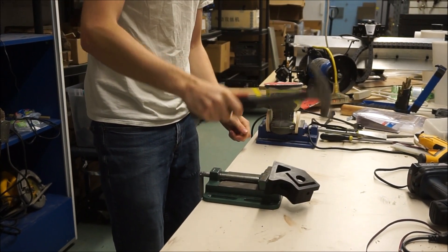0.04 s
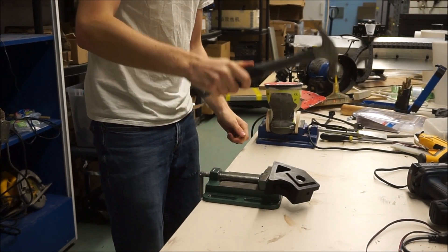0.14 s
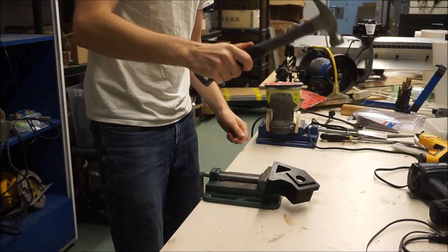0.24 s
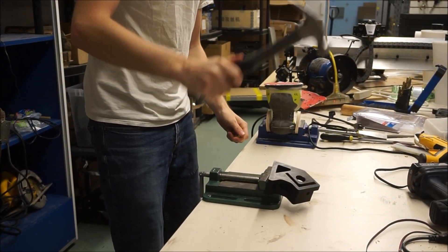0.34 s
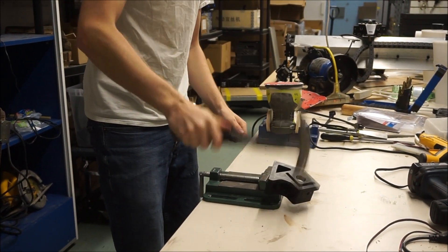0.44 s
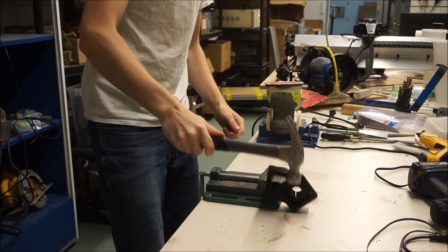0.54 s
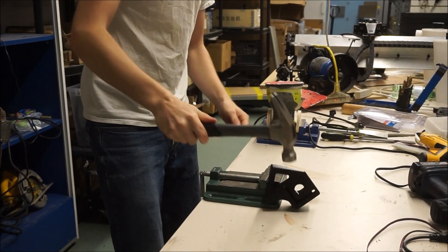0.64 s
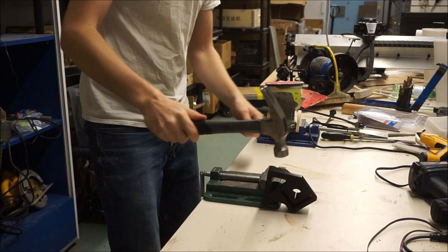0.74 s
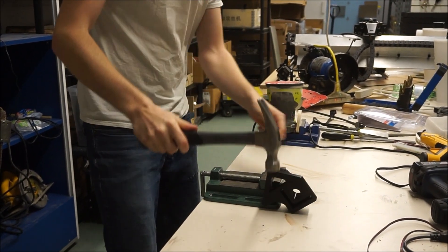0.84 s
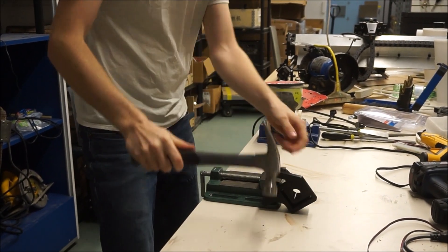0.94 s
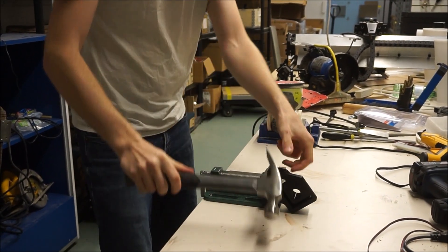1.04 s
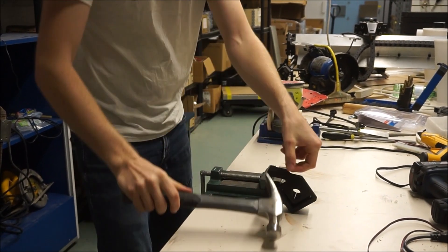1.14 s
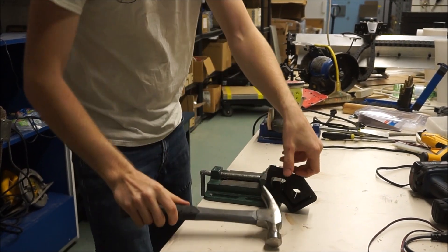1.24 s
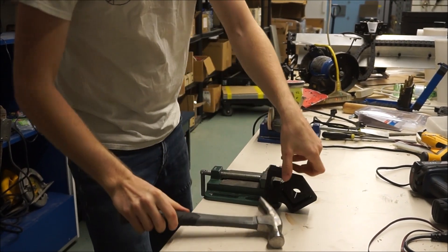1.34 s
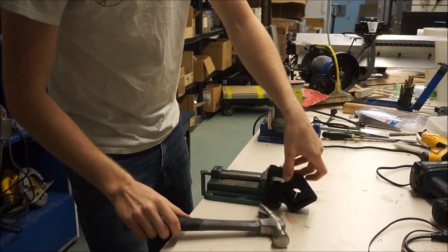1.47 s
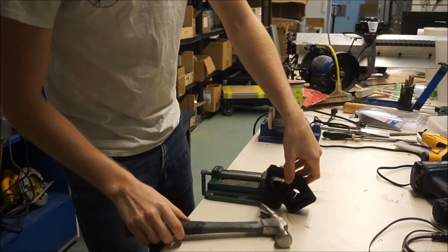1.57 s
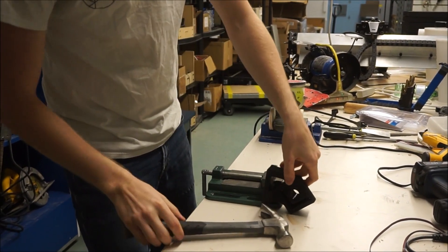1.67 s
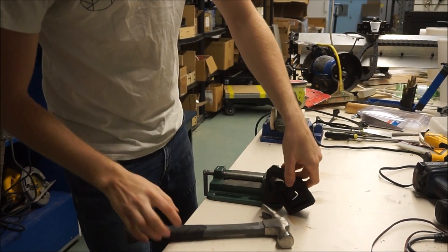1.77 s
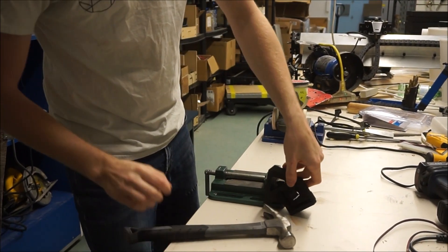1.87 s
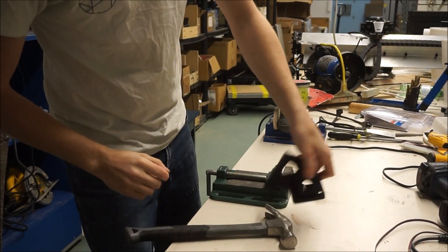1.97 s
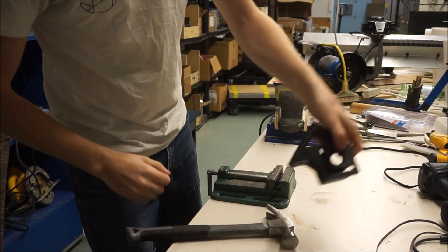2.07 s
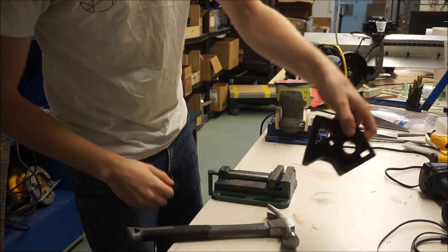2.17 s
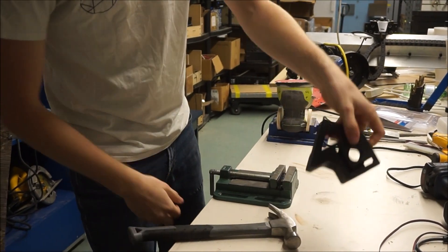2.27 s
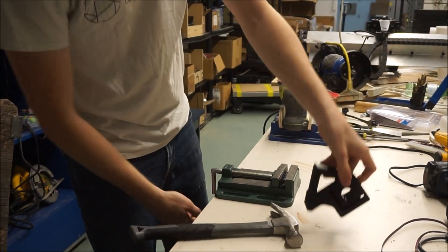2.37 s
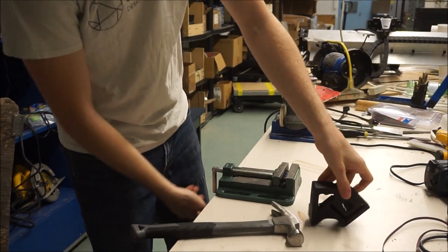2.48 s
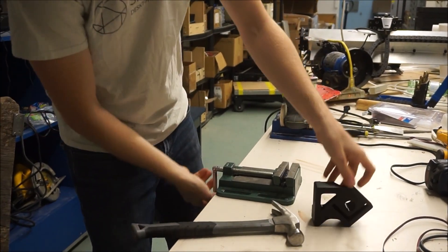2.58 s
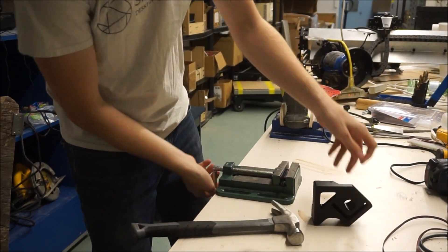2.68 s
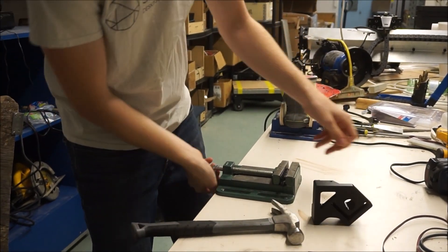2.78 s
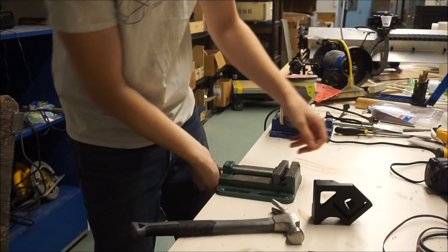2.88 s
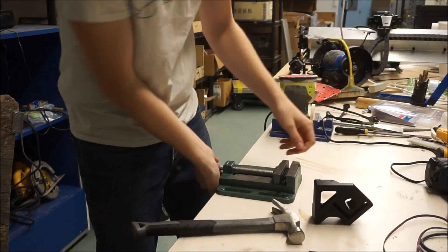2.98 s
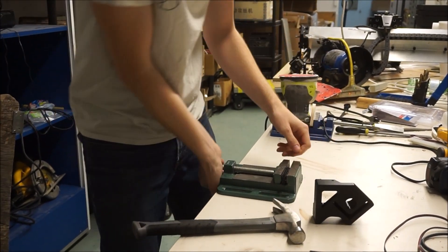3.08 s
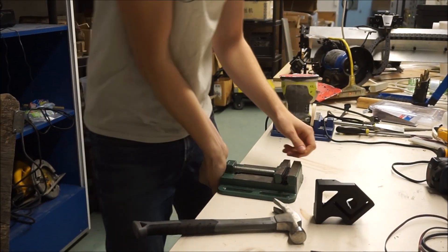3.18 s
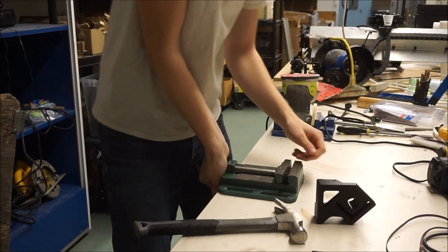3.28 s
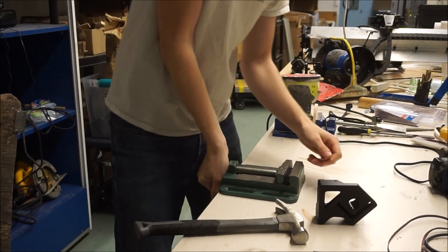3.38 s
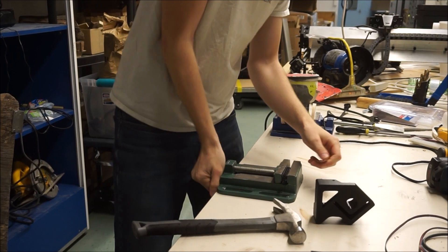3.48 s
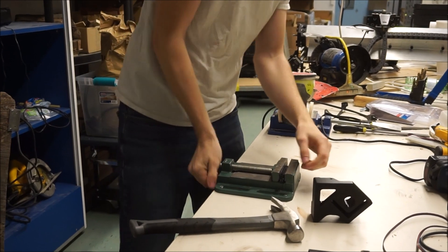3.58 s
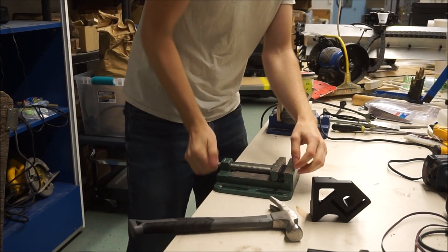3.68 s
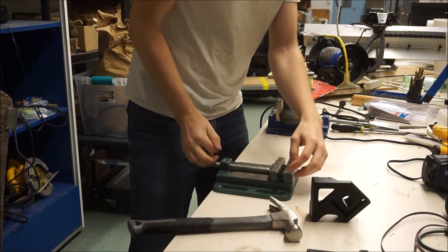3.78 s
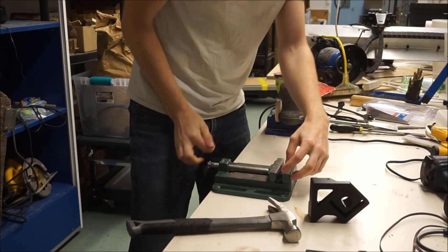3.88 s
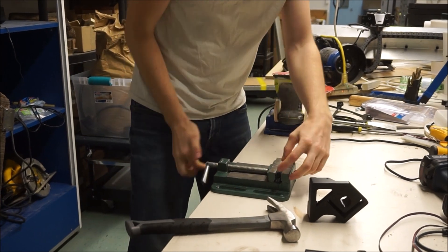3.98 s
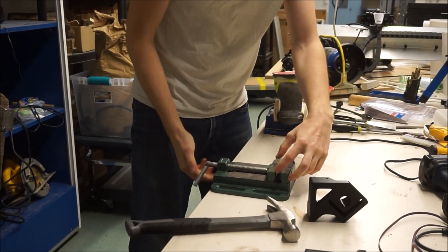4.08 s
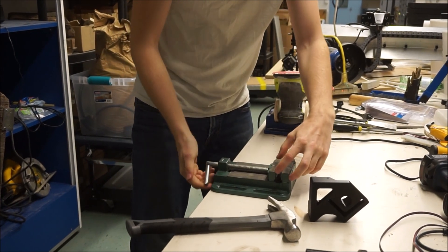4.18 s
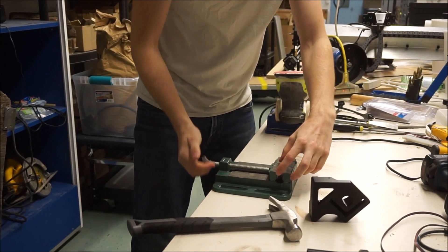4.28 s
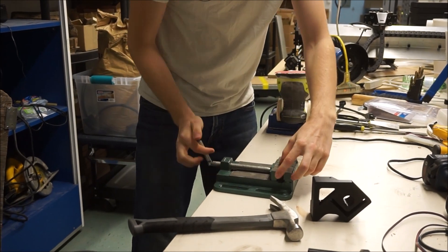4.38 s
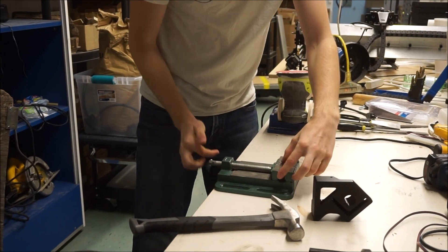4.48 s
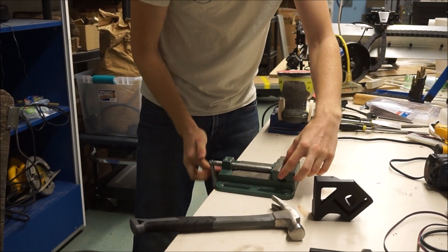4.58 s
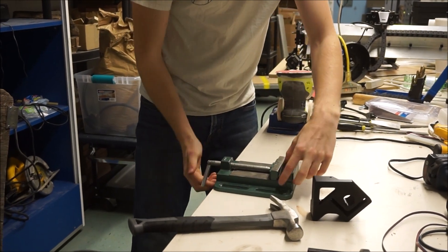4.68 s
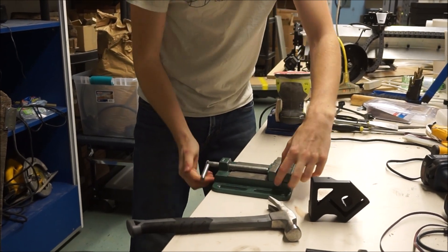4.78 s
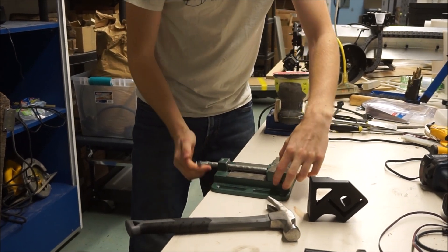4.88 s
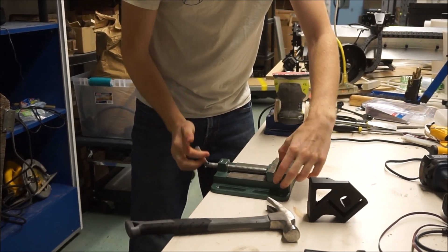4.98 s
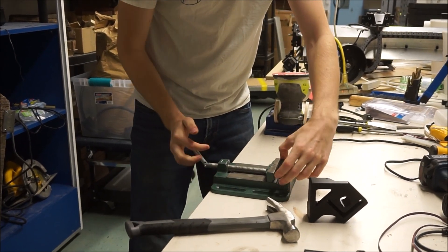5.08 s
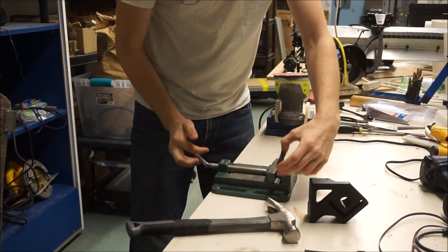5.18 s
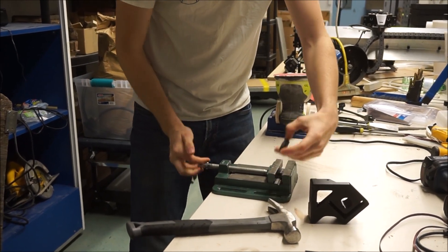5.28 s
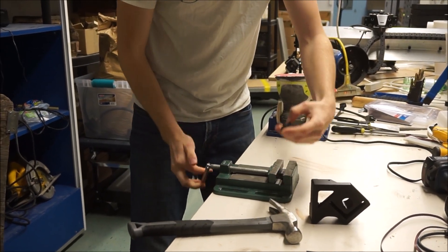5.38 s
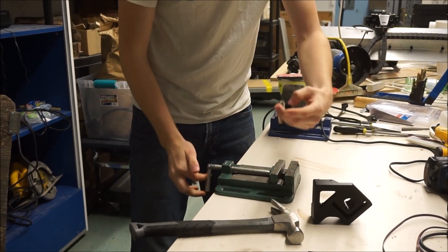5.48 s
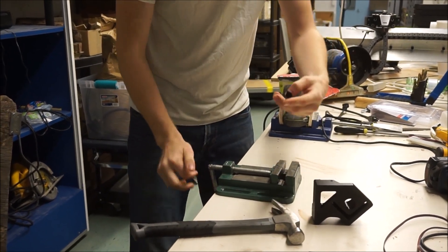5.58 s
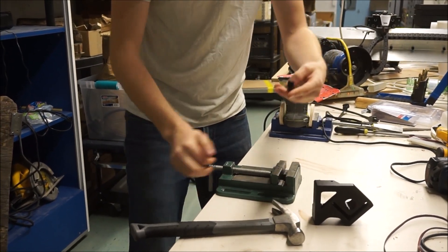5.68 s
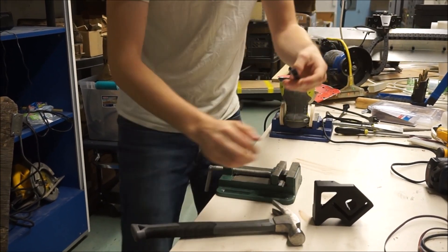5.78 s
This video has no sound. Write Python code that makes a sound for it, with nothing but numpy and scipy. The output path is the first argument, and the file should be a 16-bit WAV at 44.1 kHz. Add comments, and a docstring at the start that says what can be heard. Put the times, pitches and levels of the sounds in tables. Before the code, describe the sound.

An earlier blow's echo fades, a loud crack of hammer on clamped plastic follows, then tools clunk onto a bench and a vise rattles and clinks.

```python
"""Hammer, vise and plastic bracket

A live workshop still echoes from a first hammer blow; a second blow knocks the clamped plastic bracket loose.
The hammer is laid on the bench, the bracket set down, cloth brushed, the vise wound with its handle clinking.
Contacts are flat-spectrum noise bursts through a dense body response plus ringing modes; the screw is a train
of random slips. Air and cloth are coloured noise. A limiter ducks on hard blows, so the room seems to swell."""
import sys
import numpy as np
from scipy import signal
from scipy.fft import rfft, irfft, next_fast_len
from scipy.io import wavfile
from scipy.ndimage import uniform_filter1d

SR = 44100
rng = np.random.default_rng(int(sys.argv[2]) if len(sys.argv) > 2 else 0)


def store_wav(level_fs):
    """Save 16-bit WAV to argv[1]."""
    pcm = np.round(np.clip(np.atleast_2d(level_fs), -1, 1) * 32767)
    wavfile.write(sys.argv[1], SR, pcm.T.astype(np.int16))


N = 257103
LEAD = SR // 5  # samples computed ahead of the audible start
TIME = np.arange(-LEAD, N) / SR
SIDES = np.array([[1], [-1]])

# Ringing modes of bracket, hammer and vise. Each row: frequency in Hz, level in dB against the
# dense response (before ring_db and scatter), t60 in s.
BRACKET_MODES = [(556, -10, 0.23), (653, -7.5, 0.053), (928, -11, 0.14), (2430, -21.5, 0.35),
                 (3170, -26, .35), (3850, -28, 0.25)]
HAMMER_MODES = [(300.4, -17.5, 0.083), (358.5, -12, 0.14), (455, -25.5, 0.15), (636, -15, 0.36),
                (977, -33.5, .3), (1310, -23.5, .3), (4050, -44, .5), (4540, -41, 0.45),
                (5410, -34.5, 0.37), (6250, -35.5, 0.17), (6755, -34.5, 0.21), (8080, -38.5, 0.25)]
VISE_MODES = [(822.2, -1, 0.04), (892, -24, 0.15), (1023, -6, 0.043), (1218, -7, 0.06), (1607, -26, 0.49),
              (1610, -36, 0.13), (1830, -23, 0.78), (2080, -53, 0.26), (2730, -25.5, 0.07),
              (3044, -29.5, 0.2), (3386, -32, 0.16)]
# Dense, well-damped response of the vise. Each row: frequency in Hz, relative level in dB per Hz.
VISE_BODY = [(40, -78), (130, -37.5), (300, -2.5), (600, -0.5), (820, -2.5), (1130, 0), (1380, -11),
             (1800, -12), (2400, -20.5), (2950, -21.5), (4000, -45.5), (14000, -56.5)]


def from_db(db):
    """Decibels to gain."""
    return 10 ** (np.asarray(db) / 20)


def unit_energy(x):
    """Scale so that the squares sum to one."""
    return x / np.sqrt(np.sum(x ** 2) + 1e-20)


def rms_one(x):
    """Scale to rms one."""
    return x / np.sqrt(np.mean(x ** 2) + 1e-20)


def at_hz(points, hz):
    """Read a table on a log-frequency axis."""
    f, value = np.transpose(points)
    return np.interp(np.log(np.maximum(hz, 1)), np.log(f), value)


def colour(x, points):
    """Causal (minimum-phase) filter with the given (Hz, dB) response, by folding the cepstrum."""
    size = 2 * next_fast_len(x.shape[-1] // 2 + 2048)
    gain = from_db(at_hz(points, np.fft.rfftfreq(size, 1 / SR)))
    cepstrum = irfft(np.log(gain))
    cepstrum[1:size // 2] *= 2
    cepstrum[size // 2 + 1:] = 0
    response = np.exp(rfft(cepstrum))
    return irfft(rfft(x, size) * response)[..., :x.shape[-1]]


def stereo_noise(size):
    """White diffuse noise whose left-right correlation depends on frequency."""
    # Each row: frequency in Hz, left-right correlation.
    likeness = [(150, 0.99), (280, 1), (550, 0.94), (1100, 0.49), (2200, 0.32), (5000, 0.06), (12000, 0.78)]
    mid, side = rfft(rng.standard_normal((2, size)))
    alike = np.clip(at_hz(likeness, np.fft.rfftfreq(size, 1 / SR)), -1, 1)
    mid = np.sqrt((1 + alike) / 2) * mid
    side = np.sqrt((1 - alike) / 2) * side
    return irfft(mid + side * SIDES, size)


def stroke(start_s, length_s, db, attack_s, release_db_per_s, sag_db_per_s=0):
    """Gain of one hand movement: it builds up, holds or slackens, and dies away."""
    age_s = np.maximum(TIME - start_s, 0)
    over_s = np.maximum(age_s - length_s, 0)
    level_db = db - sag_db_per_s * age_s - release_db_per_s * over_s
    return np.minimum(age_s / attack_s, 1) * from_db(level_db)


def contact(t, chatter_ms):
    """The touching faces press home in a share of the chatter time, then chatter to rest."""
    grip_share = 0.12
    age = 1000 * t[:SR // 4] / max(chatter_ms, 0.2)  # in chatter times
    press = 1 - np.exp(-age / grip_share)
    force = rng.standard_normal(len(age)) * np.exp(-age) * press
    # short but even in spectrum, so the struck body gives the colour
    for _ in range(4):
        spectrum = rfft(unit_energy(force))
        flat = irfft(spectrum / (np.abs(spectrum) + 1e-9), len(age))
        force = flat * np.exp(-0.1 * age) * np.sqrt(press)
    return unit_energy(np.pad(force, (0, len(t) - len(age))))


def ringing(t, hz, t60):
    """A cluster of five close partials, as of bolted and clamped parts, that beat as they die."""
    split = 0.00673  # spread as a share of the frequency
    offsets = np.linspace(-1, 1, num=5) + rng.uniform(-0.2, 0.2, size=5)
    partials_hz = hz * (1 + split * offsets)
    turns = partials_hz[:, None] * t + rng.random((5, 1))
    waves = np.sin(2 * np.pi * turns, dtype=np.float32)
    return unit_energy(waves.sum(axis=0) * from_db(-60 * t / t60))


def strike(body, modes, ring_db, start_s, db, chatter_ms, treble_db=0, bass_db=0):
    """A contact sets off a dense thud and modes of random strength; levels are over 10 ms."""
    scatter_db = 3.5  # each contact lands elsewhere and favours other modes
    t = np.arange(SR // 2) / SR
    hit = unit_energy(colour(contact(t, chatter_ms), body))
    swell = 1 - np.exp(-1000 * t / max(chatter_ms / 2, 0.2))
    for hz, mode_db, t60 in modes:
        level_db = ring_db + mode_db + scatter_db * rng.normal()
        hit = hit + swell * ringing(t, hz, t60) * from_db(level_db)
    # a heavy contact adds bass, a hard one treble
    hit = colour(hit, [(70, 0), (280, bass_db), (800, 0), (1300, 0), (10000, treble_db)])
    out = np.zeros(len(TIME) + SR)
    start = LEAD + round(start_s * SR)
    out[start:start + len(t)] = from_db(db) * np.sqrt(SR / 100) * hit
    return out[:len(TIME)]


def strikes(rows, body, modes=(), ring_db=0):
    """All the contacts of a table on one object."""
    return sum(strike(body, modes, ring_db, *row) for row in rows)


def workshop():
    """Diffuse echo of the room: it builds up within milliseconds and dies band by band."""
    # Each row: band centre in Hz, t60 in s.
    room_t60 = [(150, 0.79), (400, 0.72), (1000, 0.68), (2500, 0.66), (5000, 0.57), (9000, 0.48),
                (15000, 0.39)]
    build_up_s = 0.0013
    t = np.arange(SR) / SR
    noise = rfft(stereo_noise(SR))
    hz = np.fft.rfftfreq(SR, 1 / SR)
    centres = np.array(room_t60)[:, 0]
    echo = 0
    for share, (_, t60) in zip(np.eye(len(centres)), room_t60):
        band = irfft(noise * at_hz(np.c_[centres, share], hz), SR)
        echo = echo + band * from_db(-60 * t / t60)
    return np.sqrt(2) * unit_energy(echo * (1 - np.exp(-(t / build_up_s) ** 2)))


def in_room(x, echo, room_db, path=None):
    """Direct sound, reaching the left side one sample sooner, plus its echo."""
    # Default direct path; more treble comes by way of the walls. Each row: frequency in Hz, gain in dB.
    direct_path = [(2000, -1), (12000, -2)]
    direct = colour(x, path or direct_path)
    reflected = signal.fftconvolve(x[None], echo, axes=1)[:, :len(x)]
    return np.array([direct, np.roll(direct, 1)]) + from_db(room_db) * reflected


def workshop_air():
    """Steady workshop background: coloured diffuse noise."""
    # Each row: frequency in Hz, relative level in dB per Hz.
    air = [(18, -45.5), (30, -9), (48, -6.5), (70, -19.5), (86, -16), (165, -9), (189, -22), (426, -3),
           (512, -1), (554, -4), (3220, -18.5), (3770, -17), (16000, -30)]
    return from_db(-63) * rms_one(colour(stereo_noise(len(TIME)), air))


def brush():
    """One soft sweep of a hand over denim: coloured noise under a stroke."""
    # One sweep: start in s, length in s, level in dB.
    sweep = (3.475, 0.22, -54.5)
    # Each row: frequency in Hz, relative level in dB per Hz.
    cloth = [(100, -23), (350, -0.5), (2500, 5), (7000, -2), (14000, -13.5)]
    gain = stroke(*sweep, attack_s=0.089, release_db_per_s=60)
    return gain * rms_one(colour(stereo_noise(len(TIME)), cloth))


def handle_clinks(ring_db):
    """The loose bar slides against its stops and rings as far as the fingers let it."""
    # Each row: start in s, level in dB, chatter time in ms, treble in dB,
    # freedom to ring in dB (low where fingers hold the bar).
    clinks = [(3.837, -25.5, 3.2, -16.5, -4), (3.993, -20, 28, -12, -25), (4.129, -11, 3.5, -28, -6),
              (4.319, -42.5, 4.2, 1.5, -7), (4.346, -46, 1.1, -6, 9.5), (4.6204, -45, 3.5, 15, -12),
              (4.749, -39.5, 5.7, 0, -21), (5.228, -54, 3.5, 12.5, -3), (5.637, -53.5, 5.5, 4.5, -1.5)]
    # Dense response. Each row: frequency in Hz, relative level in dB per Hz.
    handle_body = [(200, -73), (1500, 13.5), (3000, 9), (4800, 22), (6300, 11), (8500, 19), (9800, 1.5),
                   (12300, 16.5), (13800, -4), (15500, -11)]
    # Each row: frequency in Hz, level in dB against the dense response (before ring_db, freedom
    # and scatter), t60 in s.
    handle_modes = [(4770, -8, .4), (5000, -8, .3), (7500, -12, .2), (8500, -7, .16), (8740, -5, .24),
                    (10400, -16, .2), (12150, -15, .2), (13500, -11, .22)]
    return sum(strike(handle_body, handle_modes, ring_db + freedom_db, *clink)
               for *clink, freedom_db in clinks)


def screw(slips_per_s, uneven_db):
    """The thread slips in tiny uneven jerks through the vise, louder during each push, later pushes weaker."""
    # Light rubbing all the while: start in s, length in s, level in dB.
    winding = (3.7, 2, -53)
    # Firm pushes on the handle. Each row: start in s, length in s, level in dB.
    pushes = [(3.848, .42, -30.5), (4.502, 0.12, -35.5), (5.027, 0.21, -39.5)]
    attack_s, sag_db_per_s, release_db_per_s = 0.044, 16.5, 118
    swell_s, ring_db = 0.0017, -1  # how fast and how strongly a slip sets the modes ringing
    effort = stroke(*winding, attack_s, release_db_per_s)
    for push in pushes:
        effort = effort + stroke(*push, attack_s, release_db_per_s, sag_db_per_s)
    size_db = uneven_db * np.minimum(rng.exponential(size=len(TIME)), 4)
    jerks = rng.choice([-1, 1], len(TIME)) * from_db(size_db)
    slipping = rng.random(len(TIME)) < slips_per_s / SR
    slips = rms_one(slipping * jerks) * effort
    t = np.arange(SR // 2) / SR
    rings = sum(ringing(t, hz, t60) * from_db(db) for hz, db, t60 in VISE_MODES)
    rings = (1 - np.exp(-t / swell_s)) * rings
    impulse = 1.0 * (t == 0)
    response = unit_energy(colour(impulse, VISE_BODY)) + from_db(ring_db) * rings
    return signal.fftconvolve(slips, unit_energy(response))[:len(TIME)]


def jaw_rasp():
    """The jaw rasps along its guide bars: long chattering contacts without modes."""
    # Each row: start in s, level in dB, chatter time in ms.
    rasps = [(5.078, -32.5, 29.2), (5.165, -46.5, 25)]
    # Dense response of the guide bars. Each row: frequency in Hz, relative level in dB per Hz.
    rasp_body = [(200, -24), (700, -23), (1400, -1), (2000, 7.5), (2750, 5.5), (3300, -11), (3850, -3),
                 (5000, -12.5), (8000, -17), (14000, -32)]
    return strikes(rasps, rasp_body)


def jaw_knocks(ring_db, count):
    """The sliding jaw knocks across its play and rebounds, weaker each time."""
    # Each row: start in s, level in dB, chatter time in ms, treble in dB, loss per rebound in dB.
    knocks = [(4.001, -17.5, 3.9, 20.5, 29), (4.320, -21.5, 5.7, 10.5, 4.5), (4.455, -32, 4.9, -25, 23),
              (4.559, -23, 7.6, 7, 32), (4.622, -17.5, 7.8, 16.5, 13.5), (4.999, -37, 3.6, 8, 16),
              (5.230, -33.5, 11, 9, 17), (5.624, -35, 8.2, -25.5, 6.5)]
    rebound_s, bass_db = 0.024, -8  # the light jaw gives little bass
    out = 0
    for start_s, db, chatter_ms, treble_db, loss_db in knocks:
        for k in range(count):
            out = out + strike(VISE_BODY, VISE_MODES, ring_db, start_s + k * rebound_s,
                               db - k * loss_db, chatter_ms, treble_db, bass_db)
    return out


def vise_jolt(ring_db):
    """The whole vise is jolted against the bench and its modes ring."""
    # Each row: start in s, level in dB, chatter time in ms.
    jolts = [(3.834, -12, 7.1), (3.841, -18.5, 1), (3.887, -22, 12)]
    # Dense response. Each row: frequency in Hz, relative level in dB per Hz.
    jolt_body = [(40, -33), (130, -55), (300, -12), (600, -7), (850, 2.5), (1150, -7.5), (1370, -14),
                 (1640, -0.5), (2200, -11.5), (3100, -22), (4000, -30), (8000, -51), (14000, -89)]
    return strikes(jolts, jolt_body, VISE_MODES, ring_db)


def bracket_down(ring_db):
    """The bracket is lifted out of the jaws, then rocks to rest on the bench, its modes ringing."""
    # Each row: start in s, level in dB, chatter time in ms, treble in dB, bass in dB.
    touches = [(2.020, -32.5, 4.6, 13, -18), (2.108, -51, 4.2, 38, -23), (2.570, -17.5, 7.7, 1.5, 5.5),
               (2.597, -14.5, 27, 4.5, 4), (2.6455, -9.5, 4.5, -5.5, -8), (2.826, -33, 5.7, 10.5, -17)]
    # Dense response. Each row: frequency in Hz, relative level in dB per Hz.
    bracket_body = [(24, -60), (40, -48.5), (125, -36.5), (270, -11), (306, -17), (373, -6), (676, -3),
                    (728, -0.5), (956, -5.5), (1490, -15.5), (1920, -21.5), (2390, -17), (4230, -39),
                    (6460, -40.5), (15000, -69)]
    return strikes(touches, bracket_body, BRACKET_MODES, ring_db)


def hammer_down(ring_db):
    """Hammer head and grip meet the bench, which thuds while the hammer rings."""
    # Each row: start in s, level in dB, chatter time in ms, treble in dB, bass in dB.
    touches = [(1.315, -17, 9.2, 6.5, 8.5), (1.378, -12.5, 9.6, -5.5, -1.5), (1.412, -16, 42, -17.5, 3.5),
               (1.821, -34.5, 5, -12.5, -1.5), (1.831, -11.5, 6.1, -2, 6.5), (1.848, -18.5, 14, 3, 10),
               (1.909, -25.5, 3.9, 8.5, 4.5)]
    # Dense response of the bench. Each row: frequency in Hz, relative level in dB per Hz.
    bench_body = [(40, -56.5), (110, -50), (200, -12.5), (330, 1.5), (680, 7.5), (950, 4), (1400, -7),
                  (2500, -19.5), (4000, -32.5), (7000, -40), (14000, -58.5)]
    return strikes(touches, bench_body, HAMMER_MODES, ring_db)


def head_slap(echo, ring_db, room_db):
    """The head topples flat on its cheek; its flat face beams treble at the microphone."""
    # Each row: start in s, level in dB, chatter time in ms.
    slaps = [(1.481, -2.5, 0.21)]
    # Dense response. Each row: frequency in Hz, relative level in dB per Hz.
    slap_body = [(40, -49), (120, -21.5), (270, -6.5), (620, 9), (1350, 8.5), (2100, -4), (2800, -13.5),
                 (3600, -20.5), (4600, -30), (8000, -30), (11000, -55), (15000, -52.5)]
    # Direct path. Each row: frequency in Hz, gain in dB.
    slap_path = [(1200, -1.5), (2500, 4), (4500, 11), (8000, 6.5), (12000, 6)]
    slap = strikes(slaps, slap_body, HAMMER_MODES, ring_db)
    return in_room(slap, echo, room_db, slap_path)


def fracture():
    """The first blow cracks the plastic; it still echoes as the scene opens."""
    # Each row: start in s (negative: before the opening), level in dB, chatter time in ms.
    cracks = [(-.075, 7.04, 9)]
    # Dense response of the cracking plastic. Each row: frequency in Hz, relative level in dB per Hz.
    fracture_body = [(40, -37.5), (120, -44.5), (300, -7.5), (650, 2.5), (1100, 0.5), (1450, -2.5),
                     (2000, -1.5), (3000, -6), (4300, -6), (6300, -8), (9000, -12.5), (12500, -17.5),
                     (15500, -35.5)]
    return strikes(cracks, fracture_body)


def loosening_blow(ring_db):
    """The second blow knocks the clamped bracket loose in two close contacts, its modes ringing."""
    # Each row: start in s, level in dB, chatter time in ms, treble in dB, bass in dB.
    hits = [(.547, 7.7, 4.6, -1, -7), (.5515, 2.55, 1.2, -8, 3)]
    # Dense response. Each row: frequency in Hz, relative level in dB per Hz.
    blow_body = [(40, -40), (110, -30), (280, -2.5), (480, 0.5), (750, 8.5), (1050, 6.5), (1500, -1),
                 (1950, 0.5), (3000, -8.5), (4200, -9.5), (6000, -17), (9000, -24.5), (15000, -37)]
    return strikes(hits, blow_body, BRACKET_MODES, ring_db)


def limiter(x, ceiling_db, release_db_per_s, treble_weight):
    """The gain drops fast on a loud, bright sound and climbs back steadily."""
    slope = np.diff(x, prepend=0)
    sensed = x ** 2 + (treble_weight * slope) ** 2
    power = uniform_filter1d(sensed.mean(axis=0), size=220)  # 5 ms
    over_db = np.maximum(10 * np.log10(np.maximum(power, 1e-12)) - ceiling_db, 0)
    climb_db = release_db_per_s * TIME
    duck_db = np.maximum.accumulate(over_db + climb_db) - climb_db
    return x * from_db(-uniform_filter1d(duck_db, size=40))


def scene():
    """All sounds, a little to the right, through the limiter, which is already ducked at the start."""
    # Each row: frequency in Hz, left-right level difference in dB.
    balance = [(200, 0.5), (330, -0.5), (600, -2), (1200, -4), (2500, -2), (5000, 0.1), (12000, -1.5)]
    echo = workshop()
    vise = screw(slips_per_s=590, uneven_db=3) + jaw_rasp()
    vise = vise + jaw_knocks(ring_db=2.0, count=3) + vise_jolt(ring_db=-0.5)
    blows = fracture() + loosening_blow(ring_db=-18.0)
    sound = workshop_air() + brush()
    sound = sound + in_room(handle_clinks(ring_db=0.5), echo, room_db=0.5)
    sound = sound + in_room(vise, echo, room_db=2.5)
    sound = sound + in_room(bracket_down(ring_db=-3.5), echo, room_db=1.0)
    sound = sound + in_room(hammer_down(ring_db=-4), echo, room_db=2.0)
    sound = sound + head_slap(echo, ring_db=-8.0, room_db=-1.0)
    sound = sound + in_room(blows, echo, room_db=-3)
    sound = np.array([colour(side, [(hz, sign * db / 2) for hz, db in balance])
                      for side, sign in zip(sound, (1, -1))])
    limited = limiter(sound, ceiling_db=-8.0, release_db_per_s=101.0, treble_weight=7.16)
    return limited[:, LEAD:]


def record(dry):
    """The microphone shapes the spectrum, peaks are rounded and the top is cut."""
    # Each row: frequency in Hz, gain in dB.
    microphone = [(15, -29.5), (40, -4), (90, -3.5), (13500, -0.5), (16000, 3)]
    cutoff_hz = 16750  # 70 dB down from here up
    heard = np.tanh(colour(dry, microphone))
    return signal.sosfilt(signal.cheby2(16, 70, cutoff_hz, fs=SR, output="sos"), heard)


dry = scene()
out = record(dry)
store_wav(out)
```